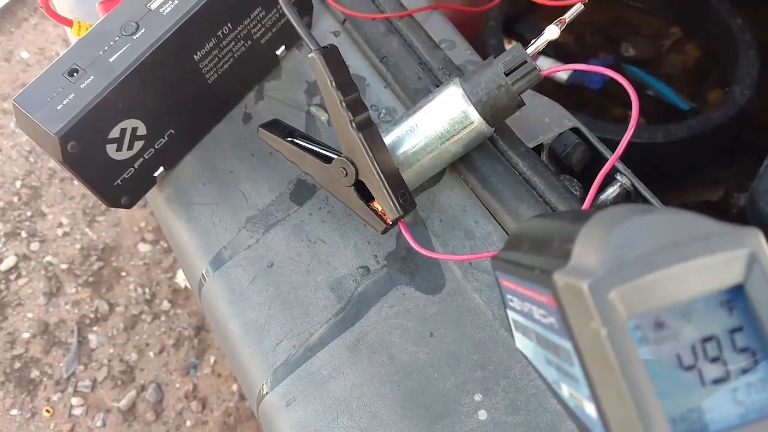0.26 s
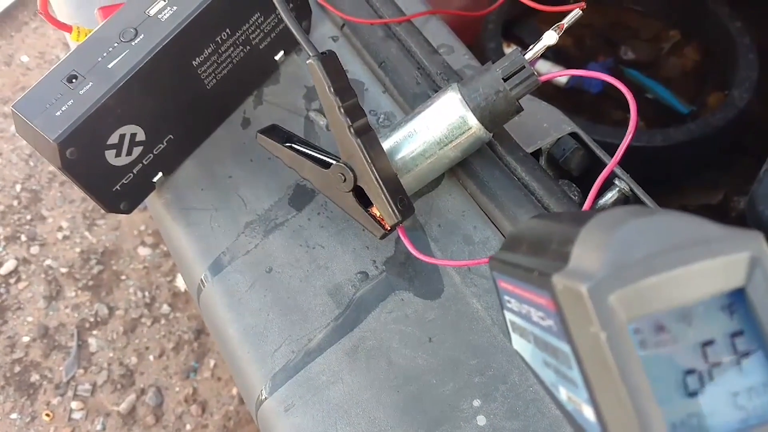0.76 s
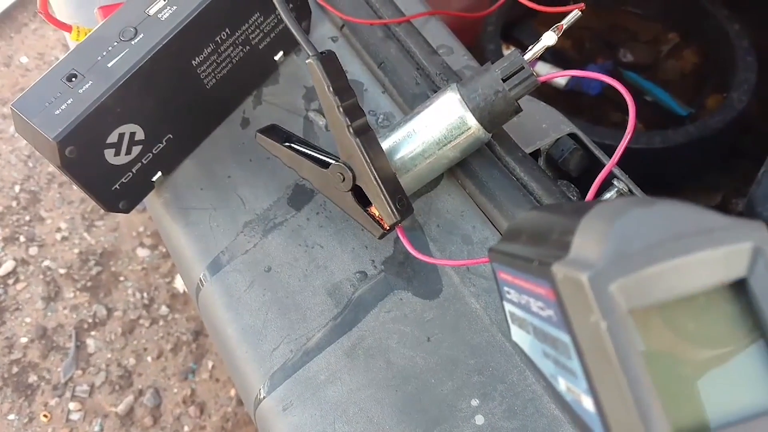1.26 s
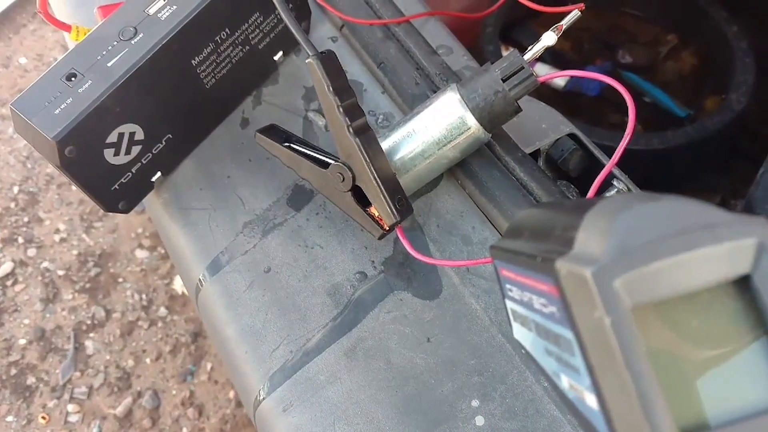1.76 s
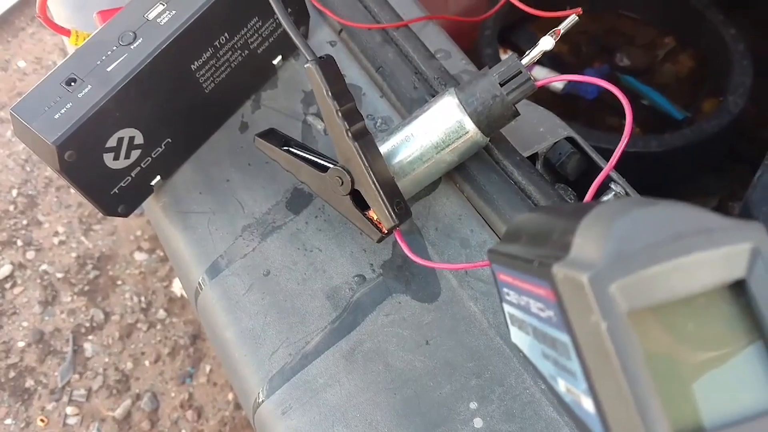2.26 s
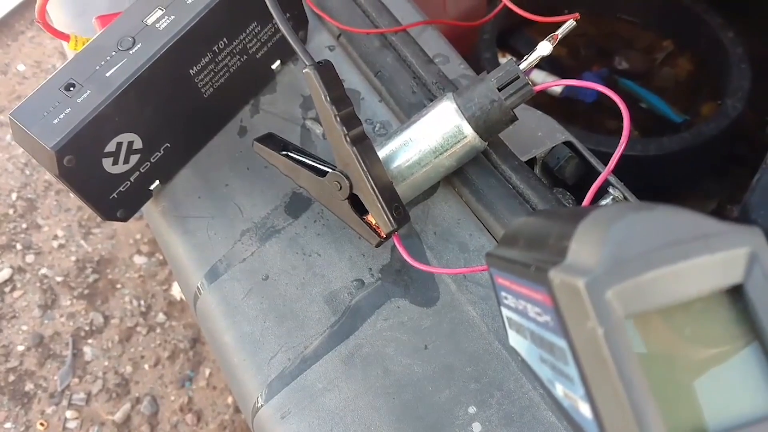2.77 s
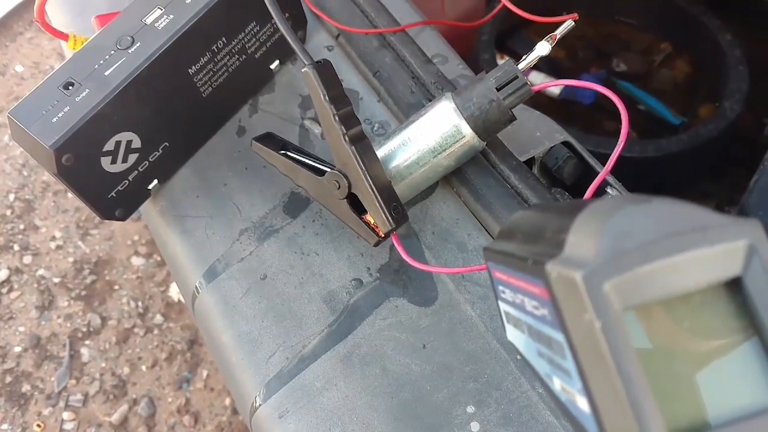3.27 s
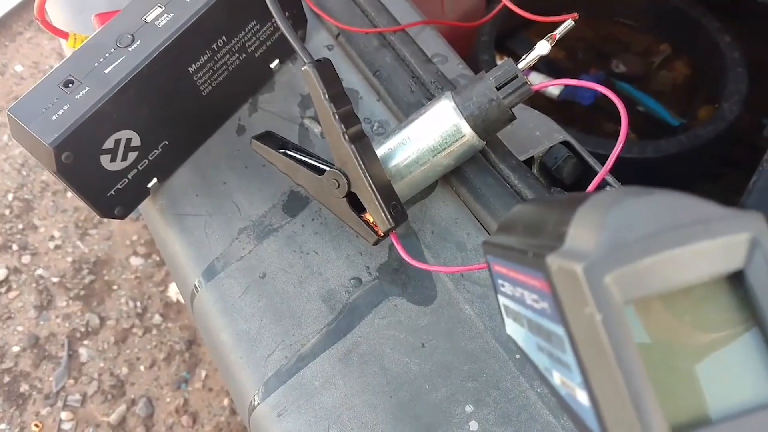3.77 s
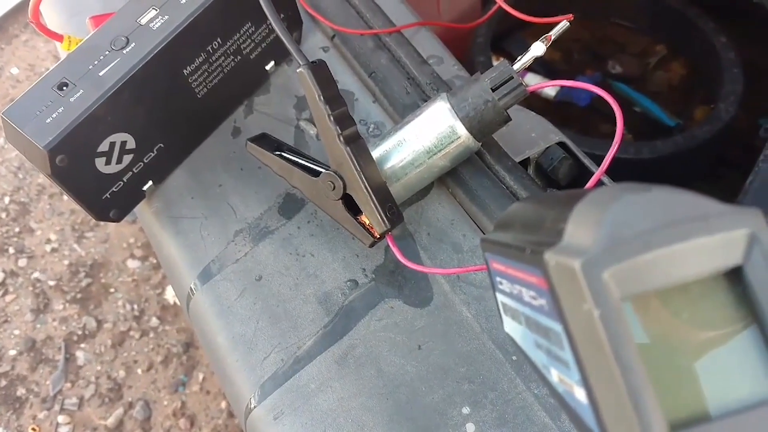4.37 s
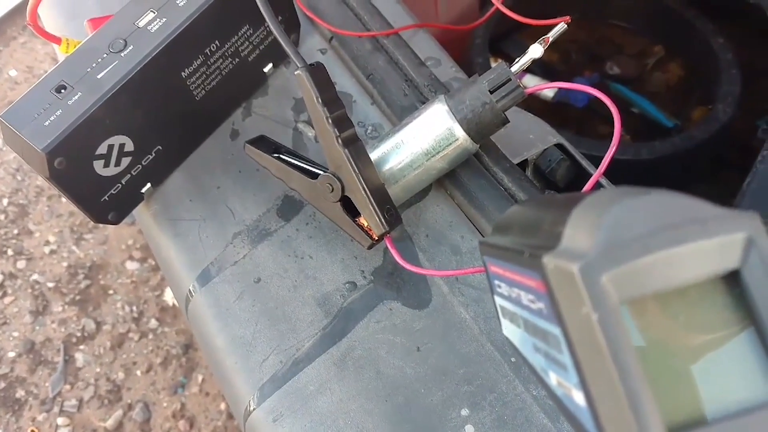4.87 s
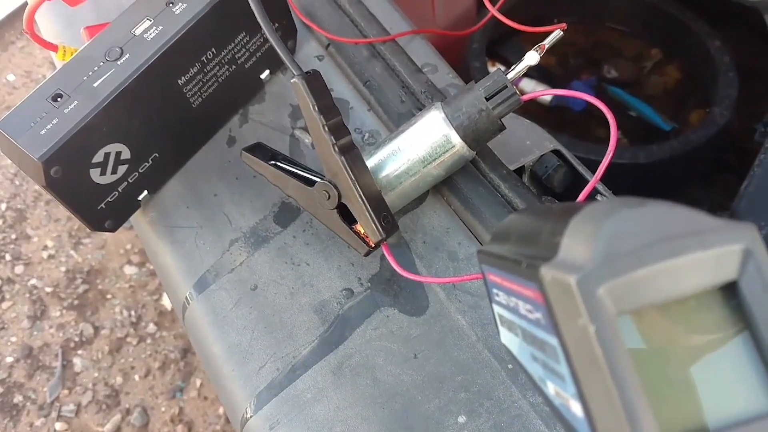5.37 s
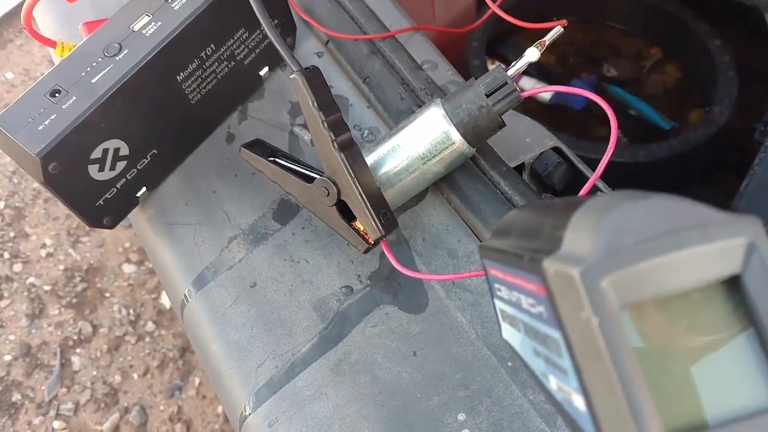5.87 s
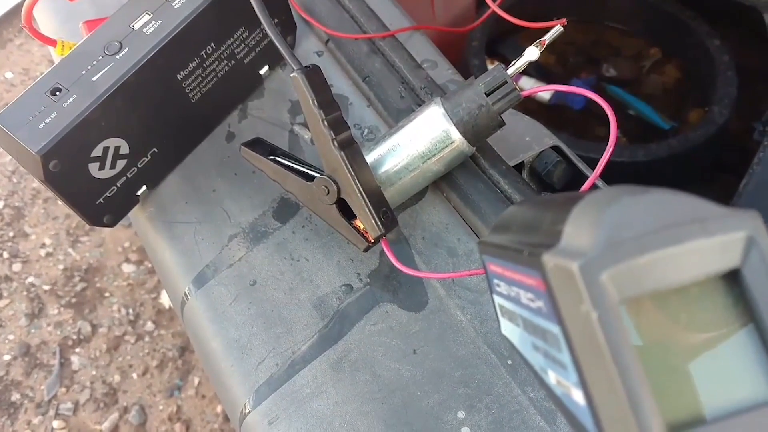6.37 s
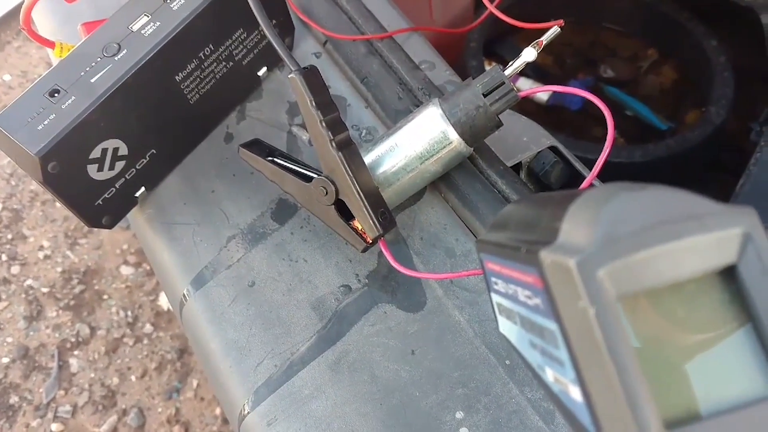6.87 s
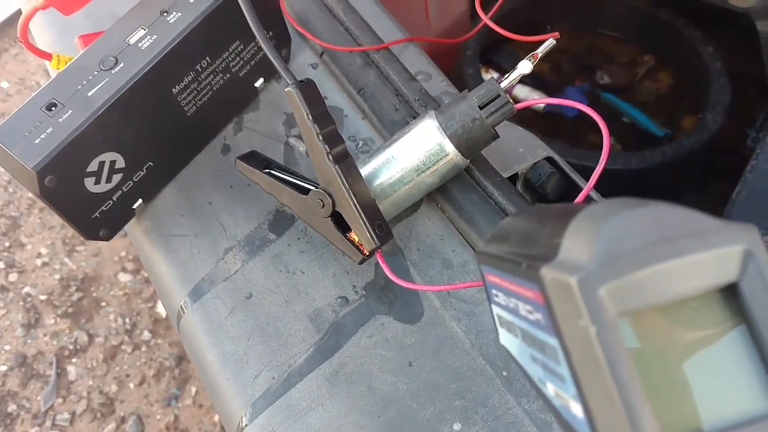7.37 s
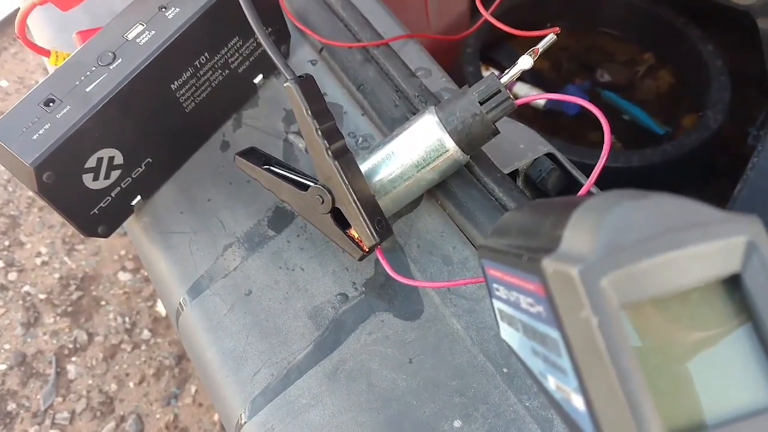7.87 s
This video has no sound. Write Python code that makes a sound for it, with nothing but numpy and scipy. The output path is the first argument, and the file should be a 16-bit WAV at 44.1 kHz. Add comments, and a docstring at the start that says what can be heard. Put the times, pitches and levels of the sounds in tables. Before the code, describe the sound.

Outdoors, low gusts of wind buffet a close microphone as a little electric pump spins without liquid. Its piercing whine wavers slightly above a churning hiss and faint hum, with scattered small ticks from the casing. The wind thumps ease after the middle, leaving the whine going steadily to the end, a touch higher in pitch.

```python
"""A thin whine over hum and churning air: a small electric fuel pump runs dry outdoors, close to a phone.
Its tones are harmonics of the shaft rotation, from unbalance, brushes, commutator and impeller blades.
Wind turbulence rumbles and thumps on the two microphone ports, rattles ring in the pump housing, and
late on a faint steady tone sounds. The phone widens the stereo image and limits the loudest thumps."""
import sys
import numpy as np
from scipy import signal
from scipy.fft import rfft, irfft, next_fast_len
from scipy.io import wavfile
from scipy.ndimage import uniform_filter1d, minimum_filter1d, map_coordinates

SR = 44100
rng = np.random.default_rng(int(sys.argv[2]) if len(sys.argv) > 2 else 0)


def output_pcm(signal):
    """Save a mono or channel-first signal as 16-bit PCM at the path in sys.argv[1].

    Samples are clipped to [-1, 1] before scaling.
    """
    pcm = np.clip(np.atleast_2d(signal).T, -1, 1) * 32767
    wavfile.write(sys.argv[1], SR, np.round(pcm).astype(np.int16))


N = 358533

# Phase lag of the pump's noise at the rear port: (frequency [Hz], lag [rad])
REAR_LAG = [(900, -0.066), (1900, 0.22), (3100, 1.42), (4500, 2.26), (5400, 1.6), (6400, -0.3),
            (7250, -1.1), (7900, -0.6), (9000, -0.13)]


def amp(db):
    """Decibels to amplitude ratio."""
    return 10 ** (np.asarray(db) / 20)


def along(points, hz):
    """Interpolation of (frequency, value) points on a logarithmic frequency axis."""
    f, values = np.transpose(points)
    return np.interp(np.log(hz + 1), np.log(f + 1), values)


def curves(rows):
    """Linear interpolation in time: one value per sample for each column after the first."""
    times, *columns = np.transpose(rows)
    return [np.interp(np.arange(N) / SR, times, column) for column in columns]


def wobble(rate):
    """Smooth random modulation: a spline through `rate` Gaussian knots a second."""
    steps = np.arange(0, N + 32, 32)
    knots = rng.standard_normal(int(N * 200 / SR) + 8)
    return np.interp(np.arange(N), steps, map_coordinates(knots, [steps * rate / SR]))


def filtered(x, response):
    """Linear filtering: the spectrum is multiplied by a complex frequency response."""
    size = next_fast_len(N + SR // 2)
    return irfft(rfft(x, size) * response(np.fft.rfftfreq(size, 1 / SR)), size)[..., :N]


def patchy_noise(depth_db):
    """Modulated noise: two independent signals share random patches of gain in time and frequency."""
    spectra = signal.stft(rng.standard_normal((2, N)), nperseg=512)[2]
    patches = uniform_filter1d(rng.standard_normal(spectra.shape[1:]), size=6, axis=0)
    patches = uniform_filter1d(patches, size=10, axis=1)
    return signal.istft(spectra * amp(depth_db * patches / patches.std()), nperseg=512)[1][:, :N]


def shaft_tones(turns, commutator_db, whine_db):
    """Periodic forces radiate harmonics of the shaft rate; each swings about its own mean level."""
    # Harmonics: (shaft order, front level [dB], rear minus front [dB], front lead [rad])
    harmonics = [(1, -48.5, -3, -0.4), (2, -46.5, -5, 0.06), (3, -52.5, -7, 0), (5, -63, -8, 3.5),
                 (6, -67, -19, -2.5), (7, -62.5, -0.5, 2), (8, -67.5, 1, 0), (9, -75.5, 5.5, -0.5),
                 (11, -67.5, 0.5, 1.5), (16, -64.5, 5, 1.5), (17, -63, -12, 5.5), (22, -69, -2, 1.5),
                 (24, -64.5, -3, 0.1), (32, -50, -4, 1.5), (33, -66, -4, 1.6), (45, -65, -14, 11),
                 (46, -47.5, -3, 3.5), (47, -28.5, -10.5, 1.85), (48, -51.5, -10, 5), (49, -88, -17, -5)]
    # Once-a-turn hum: (time [s], relative level [dB])
    unbalance = [(0, -1), (1.5, -1), (3.0, -3), (4.1, 3.5), (5.0, 5), (6.1, 3), (6.6, 0.5), (8.13, 1)]
    # Shaft hum: (time [s], relative level of order 2 [dB], of order 3 [dB])
    hum = [(0.0, -52, -58), (0.04, -52.5, -56), (0.27, -48, -59.5), (0.52, -50, -47.5), (0.68, -41, -46),
           (0.74, -57, -64), (0.81, -48, -58.5), (1.13, -50, -53), (1.2, -42, -51), (1.27, -59, -73),
           (1.33, -46.5, -51.5), (1.54, -50.5, -61), (1.81, -47, -53), (2.22, -48, -58.5), (2.26, -60, -81),
           (2.42, -41.5, -49), (2.58, -53, -58), (2.78, -44.5, -47), (3.1, -64, -64), (3.26, -41.5, -53),
           (3.35, -64, -63), (3.51, -43, -43), (3.71, -51, -54), (3.92, -42, -51), (3.96, -64, -61),
           (4.01, -49.5, -48), (4.35, -50, -60), (4.44, -60, -55.5), (5.14, -44, -54.5), (5.21, -50, -46),
           (5.34, -50, -56), (5.39, -44, -41), (5.43, -52.5, -55.5), (5.82, -46, -50.5), (5.86, -35.5, -38),
           (5.93, -54, -61), (6.14, -44, -49), (6.18, -50, -54.5), (6.25, -40.5, -41.5), (6.54, -45.5, -51),
           (6.59, -54, -55), (6.86, -53, -58), (6.9, -44, -45), (6.97, -55, -61), (7.29, -46, -51),
           (7.31, -50.5, -61), (7.74, -45.5, -47.5), (8.13, -48, -54)]
    # Brush tones: (time [s], relative level of order 7 [dB], of order 8 [dB])
    brushes = [(0.0, -67, -68), (0.34, -64.5, -63), (2.62, -59.5, -62.5), (2.83, -60, -59),
               (2.87, -74, -66), (3.06, -63, -62), (4.5, -63, -59), (4.75, -56, -76), (4.96, -52, -60),
               (5.07, -70, -57), (5.82, -56.5, -62.5), (5.91, -66, -69), (5.98, -64, -61), (6.29, -55, -58),
               (6.38, -58, -62), (6.61, -64, -59), (7.06, -63, -70), (7.18, -59, -58), (7.38, -66, -66),
               (8.13, -65, -60.5)]
    hum_db = curves(hum) - 2 * wobble(rate=14) ** 2  # brief random dips
    low_order_db = dict(zip((1, 2, 3, 7, 8), (*curves(unbalance), *hum_db, *curves(brushes))))
    out = np.zeros((2, N))
    for order, db, rear_db, lead in harmonics:
        swell_db = low_order_db.get(order, commutator_db if order < 40 else whine_db)
        flutter_db = (.8 if order == 1 else 3 if order < 4 else 2.5 if order < 30 else 1.1) * wobble(42)
        jitter = (.1 if order == 1 else .55 if order < 4 else .35) * wobble(40)
        phase = 2 * np.pi * order * turns + jitter + rng.uniform(0, 2 * np.pi)
        peak = np.sqrt(2) * amp(db + swell_db - swell_db.mean() + flutter_db)
        out += peak * np.array([np.sin(phase), amp(rear_db) * np.sin(phase - lead)])
    return out


def churn(turns, swell_db, treble_db, level_db=-39.5):
    """Broadband impeller and brush noise, pulsing once and twice a turn, partly coherent at the ports."""
    # Noise spectrum: (frequency [Hz], relative density [dB])
    spectrum = [(60, -11.5), (250, -1), (450, 8), (900, -0.5), (1700, -10), (2150, -2.5), (2330, -1.5),
                (2480, -5.5), (2700, 2), (2950, 3), (3300, -0.5), (3550, -1), (3800, -2.5), (3950, -1),
                (4150, -5), (4600, 0.5), (5000, -17), (5600, -6.5), (6650, -9.5), (7300, -2), (7500, -2.5),
                (8300, 4), (9100, -10), (10500, 5), (11700, -1), (12250, -7), (12700, 0), (13700, -23),
                (14700, -34), (15500, -20)]
    # Acoustic shading of the rear port: (frequency [Hz], rear minus front [dB])
    shading = [(200, 8.5), (900, -13), (2100, 3), (2600, -6.5), (3100, -2), (3800, -3), (4500, -2.5),
               (5800, -0.5), (7500, 3), (9500, 5), (11200, -8.5), (13000, -1)]
    # Likeness of the ports: (frequency [Hz], correlation before clipping [ratio])
    correlation = [(200, 1), (1500, 0.59), (2200, 0.3), (3100, 0.76), (3800, -0.048), (4500, 0.61),
                   (5600, 0.34), (7500, 0.47), (11500, 0.075), (12700, -1.04), (14000, 0.2), (15000, -0.82)]
    shade = lambda hz: amp(along(shading, hz))
    alike = lambda hz: np.clip(along(correlation, hz), -.99, .99)
    pulse = 1 + 0.063 * np.sin(2 * np.pi * turns) + 0.13 * np.sin(4 * np.pi * turns)
    front, other = filtered(patchy_noise(depth_db=1.5) * pulse, lambda hz: amp(along(spectrum, hz)))
    coherent = filtered(front, lambda hz: shade(hz) * alike(hz) * np.exp(-1j * along(REAR_LAG, hz)))
    incoherent = filtered(other, lambda hz: shade(hz) * np.sqrt(1 - alike(hz) ** 2))
    ports = np.array([front, coherent + incoherent]) / front.std()
    treble = filtered(ports, lambda hz: hz > 5000)
    shelved = ports - treble + amp(treble_db) * treble
    return amp(level_db + swell_db - swell_db.mean() + 0.25 * wobble(6.8)) * shelved


def pump(blades=47, wander_hz=16):
    """Rotor sound: one shaft, turning at the blade-passing rate over the blade count, drives it all."""
    # Impeller speed: (time [s], blade-passing frequency [Hz])
    speed = [(0.0, 8367), (0.07, 8435), (0.22, 8349), (0.32, 8416), (0.63, 8424), (0.74, 8358),
             (1.31, 8364), (1.36, 8455), (1.45, 8458), (1.49, 8360), (1.81, 8428), (2.17, 8360),
             (2.38, 8368), (2.49, 8435), (2.62, 8348), (3.6, 8510), (3.67, 8451), (4.05, 8590),
             (4.23, 8465), (4.78, 8541), (5.21, 8486), (5.25, 8548), (5.8, 8494), (5.86, 8621),
             (6.11, 8454), (6.29, 8625), (6.41, 8675), (6.61, 8552), (6.93, 8592), (7.11, 8529),
             (7.54, 8645), (7.9, 8617), (8.06, 8528), (8.13, 8559)]
    # Swings in loudness: (time [s], relative whine level [dB], relative churn level [dB])
    levels = [(0.0, -40, -58), (0.09, -38, -57.5), (0.16, -39, -57), (0.31, -35, -53.5), (0.34, -36, -55.5),
              (0.41, -36.5, -52.5), (0.62, -33.5, -52.5), (0.63, -36, -53.5), (1.09, -34, -51.5),
              (1.27, -36.5, -54), (1.36, -35, -53), (1.63, -37, -53.5), (1.71, -36.5, -53.5),
              (1.78, -36, -52.5), (1.9, -38.5, -53), (2.26, -35, -52), (2.44, -37.5, -53.5),
              (2.51, -34.5, -53.5), (2.56, -37, -53.5), (2.81, -34.5, -50.5), (2.87, -39.5, -55.5),
              (3.0, -38, -52), (3.2, -36.5, -55), (3.54, -36, -51), (3.6, -37.5, -56.5), (3.62, -35.5, -51),
              (3.8, -35, -51.5), (4.26, -39, -53.5), (4.28, -36.5, -51.5), (4.59, -37.5, -50),
              (4.63, -40, -53.5), (4.76, -37.5, -51), (5.36, -35, -52), (5.62, -36.5, -52),
              (5.81, -39.5, -54.5), (5.85, -35.5, -54.5), (5.99, -38.5, -53), (6.29, -35, -51.5),
              (6.37, -37.5, -53.5), (6.48, -35, -51.5), (6.6, -38.5, -52.5), (6.91, -33.5, -51.5),
              (6.95, -40.5, -57.5), (6.98, -38.5, -54), (7.0, -36.5, -58), (7.03, -39, -53),
              (7.07, -39.5, -53), (7.15, -37, -51.5), (7.98, -35, -55), (8.03, -35.5, -52),
              (8.1, -38.5, -53.5), (8.13, -38, -53.5)]
    blade_hz = curves(speed)[0] + wander_hz * wobble(rate=28)
    turns = np.cumsum(blade_hz / blades) / SR
    excess_hz = blade_hz - blade_hz.mean()
    whine_db, churn_db = curves(levels)
    # The commutator follows part of the whine's swings and weakens below the mean speed.
    commutator_db = 0.61 * whine_db + 0.06 * np.minimum(excess_hz, 0)
    tones = shaft_tones(turns, commutator_db, whine_db)
    return tones + churn(turns, churn_db, treble_db=0.004 * excess_hz)


def wind(gust_db=5):
    """Turbulent pressure rumbles independently at each port; single eddies thump for about one cycle."""
    # Wind strength: (time [s], level [dB])
    strength = [(0.1, -42), (0.45, -35.5), (0.68, -27.5), (0.85, -39.5), (1.1, -41.5), (1.25, -41),
                (1.4, -38.5), (1.65, -48), (1.9, -42.5), (2.2, -44.5), (2.45, -40), (2.65, -41.5),
                (2.95, -27.5), (3.08, -35), (3.3, -36), (3.65, -45.5), (3.9, -42), (4.35, -56),
                (4.65, -39.5), (5, -45), (5.3, -41.5), (5.7, -51), (6.0, -57), (6.15, -52), (6.6, -59),
                (7.4, -58), (8.1, -55.5)]
    # Turbulence spectrum: (frequency [Hz], relative density [dB])
    spectrum = [(20, -41), (50, 3), (110, 3.5), (180, 0.5), (300, -6), (600, -21.5), (1200, -47.5)]
    # Strongest eddies: (time [s], level [dB], frequency [Hz], port [0 front, 1 rear])
    large_eddies = [(0.039, -18.2, 208, 1), (0.111, -21, 150, 1), (0.183, -22, 129, 0),
                    (0.342, -18, 160, 0), (0.391, -20, 149, 1), (0.429, -22, 134, 0),
                    (0.498, -18.5, 147, 1), (0.561, -23, 112, 1), (0.593, -22, 140, 0),
                    (0.62, -9.8, 105, 1), (0.649, -17.2, 143, 1), (0.668, -15, 105, 0),
                    (0.688, -15.5, 125, 0), (0.703, -19, 120, 1), (0.982, -18.9, 151, 1),
                    (1.033, -15.1, 142, 0), (1.092, -13.7, 152, 0), (1.134, -23, 145, 0),
                    (1.297, -21, 139, 1), (1.349, -21.5, 145, 1), (1.477, -21, 150, 1),
                    (1.528, -21, 153, 0), (1.553, -23.5, 142, 1), (1.577, -23, 130, 0),
                    (1.598, -21.5, 148, 1), (1.698, -24.5, 132, 0), (1.815, -24.5, 121, 0),
                    (1.837, -18.5, 132, 1), (2.124, -24, 146, 1), (2.249, -25, 152, 0),
                    (2.477, -24, 164, 1), (2.786, -16.6, 134, 0), (2.786, -16.6, 134, 1),
                    (2.844, -11.7, 148, 0), (2.944, -8, 120, 1), (3.015, -17, 180, 1),
                    (3.044, -17.1, 119, 1), (3.105, -21.5, 132, 1), (3.134, -19, 115, 1),
                    (3.185, -17.6, 168, 1), (3.242, -22, 124, 0), (3.28, -19, 135, 1),
                    (3.305, -16.4, 170, 0), (3.336, -21, 138, 1), (3.404, -18.3, 142, 0),
                    (3.699, -20.6, 143, 1), (3.909, -16.7, 169, 0), (4.668, -21.5, 153, 1),
                    (5.21, -22.5, 127, 1), (5.241, -24, 112, 0), (5.323, -22, 112, 1)]
    strength_db, = curves(strength)
    lumps = amp(3.24 * np.array([wobble(45), wobble(45)]))
    rumble = filtered(lumps * rng.standard_normal((2, N)), lambda hz: amp(along(spectrum, hz)))
    rumble /= np.sqrt(np.mean(rumble ** 2, axis=-1, keepdims=True))
    gusts = amp(strength_db + gust_db * np.array([wobble(4), wobble(4.14)]))
    out = np.pad(gusts * rumble, ((0, 0), (SR, SR)))
    half = SR // 30
    t = np.arange(-half, half) / SR
    for time, db, hz, port in large_eddies + small_eddies(strength_db):
        cycles = t * hz
        snap = np.clip(.06 * (db + 20), 0, 1)  # strong thumps flip faster in the middle
        phase = 2 * np.pi * cycles + snap * np.tanh(14 * cycles) + rng.normal(0, 0.29)
        thump = (-1) ** round(port) * np.exp(-(cycles / .75) ** 2) * np.sin(phase)
        out[round(port), SR + round(time * SR) - half:][:len(t)] += amp(db) * thump
    # The ports leak away the slowest pressure changes.
    return filtered(out[:, SR:-SR], lambda hz: hz ** 2 / (hz ** 2 + 45 ** 2))


def small_eddies(strength_db, count=30, ceiling_db=-29.5, centre_hz=129):
    """Eddy pressure scales with the wind: random rows of (time [s], level [dB], frequency [Hz], port)."""
    when, weakness, pitch, port = rng.random((count, 4)).T
    db = np.minimum(strength_db[(when * N).astype(int)] + 22.5, ceiling_db) - 3 * weakness
    return list(zip(when * N / SR, db, centre_hz * 2 ** (pitch - .5), port))


def rattles(width_hz=770, rear_db=2, correlation=0.73, attack_s=0.0023):
    """Forced resonance: decaying noise bursts excite a broad mode of the pump housing."""
    # Rattles: (time [s], excitation level [dB], resonance [Hz], time to decay by 60 dB [s])
    bursts = [(0.609, -41, 2700, 0.058), (0.987, -28, 2700, 0.055), (1.023, -29, 2700, .06),
              (1.6071, -35, 2700, .06), (2.09, -31, 2600, .06), (2.7287, -29, 2820, 0.055),
              (2.763, -31, 2700, .06), (4.023, -26, 2600, .08), (4.392, -46, 2900, 0.066),
              (4.43, -36, 3140, 0.13), (4.454, -32, 2920, .1), (4.5, -36, 3300, .15),
              (4.5645, -37, 3020, .06), (4.817, -24, 3000, 0.04), (4.834, -31, 2800, 0.035),
              (5.085, -35, 2750, 0.081), (5.1116, -28, 2670, 0.071), (5.13, -40, 2480, 0.097),
              (5.396, -31, 2470, 0.12), (5.5072, -35, 2800, .05), (6.52, -33, 2600, .1),
              (6.9681, -38, 2830, 0.065), (7.05, -32, 2600, 0.1), (7.231, -39, 2700, 0.14),
              (7.2686, -28, 2760, 0.079), (8.013, -30, 2600, 0.094), (8.029, -29, 2630, 0.17)]
    t = np.arange(SR // 8) / SR
    f = np.fft.rfftfreq(len(t), 1 / SR)
    port_delay = np.exp(-1j * np.outer([0, 1], along(REAR_LAG, f)))
    out = np.zeros((2, N + SR))
    for time, db, hz, t60 in bursts:
        envelope = amp(db - 60 * t / t60) * (1 - np.exp(-t / attack_s))
        front, other = envelope * rng.standard_normal((2, len(t)))
        rear = amp(rear_db) * (correlation * front + np.sqrt(1 - correlation ** 2) * other)
        resonance = 1j * f * width_hz / (hz ** 2 - f ** 2 + 1j * f * width_hz)
        ringing = irfft(rfft([front, rear]) * 3 * resonance ** 2 * port_delay, len(t))
        out[:, round(time * SR):][:, :len(t)] += ringing
    return out[:, :N]


def faint_tones(fade_s=.02):
    """Gated pure tones: thin steady sines near the pump fade in and out."""
    # Tones: (time [s], duration [s], frequency [Hz], level [dB])
    notes = [(6.35, .04, 1222, -55), (6.437, 0.28, 1217, -61)]
    t = np.arange(N) / SR
    out = np.zeros(N)
    for start, length, hz, db in notes:
        gate = np.clip(np.minimum(t - start, start + length - t) / fade_s, 0, 1)
        out += amp(db) * gate * np.sin(2 * np.pi * hz * t)
    return out


def scene():
    """Superposition of all sources at the front and rear ports."""
    return pump() + rattles() + wind() + faint_tones()


def limiter(x, threshold_db=-13, strength=.7, hold_s=.1, release_s=.12):
    """Dynamic range compression: gain drops quickly after a high peak, holds, then creeps back."""
    over_db = np.maximum(20 * np.log10(np.abs(x).max(axis=0) + 1e-9) - threshold_db, 0)
    hold = int(hold_s * SR)
    held_db = -minimum_filter1d(-over_db, hold, origin=(hold - 1) // 2)
    pole = np.exp(-1 / (release_s * SR))
    released_db = np.maximum(held_db, signal.lfilter([1 - pole], [1, -pole], held_db))
    smoothed_db = uniform_filter1d(np.roll(released_db, 500), size=400)
    return x * amp(-strength * smoothed_db)


def record(dry, top_hz=15550):
    """Interference widens the image: each port minus a delayed copy of the other, limited, low-passed."""
    # Cross-feed delay, half a cycle more at each entry: (frequency [Hz])
    half_cycle_hz = [0, 1280, 2550, 3850, 5050, 6450, 7800, 9200, 10600, 12100, 13100, 14000, 15300, 16500]
    # Cross-feed strength: (frequency [Hz], gain [ratio])
    cross_gain = [(40, 0.63), (150, 0.71), (300, 0.8), (1300, 1), (2550, 1), (3850, 0.78), (5050, 1),
                  (6450, 1), (7800, 0.52), (9200, 0.79), (10600, 0.73), (13100, 0.55), (14000, 0.99),
                  (15300, 0.94)]
    lag = lambda hz: np.pi * np.interp(hz, half_cycle_hz, np.arange(len(half_cycle_hz)))
    crossfeed = filtered(dry[::-1], lambda hz: along(cross_gain, hz) * np.exp(-1j * lag(hz)))
    return filtered(limiter(dry - crossfeed), lambda hz: hz < top_hz)


dry = scene()
out = record(dry)
output_pcm(out)
```